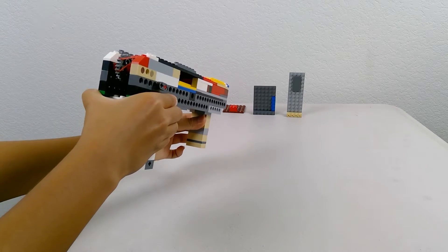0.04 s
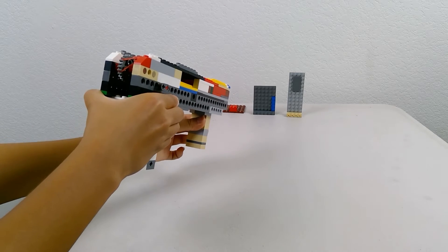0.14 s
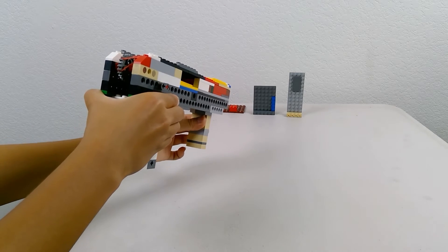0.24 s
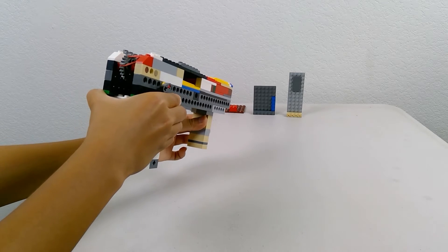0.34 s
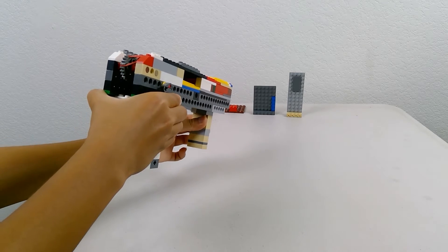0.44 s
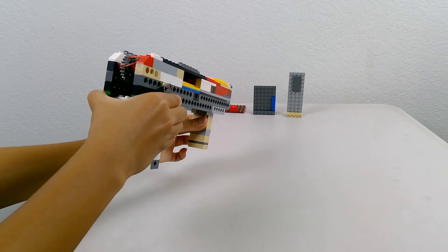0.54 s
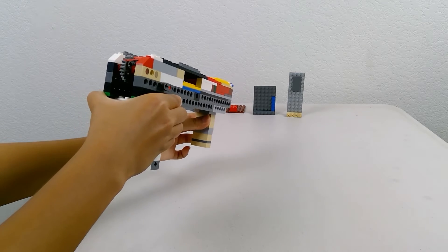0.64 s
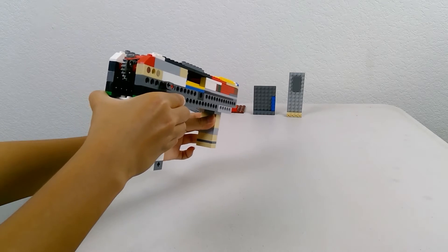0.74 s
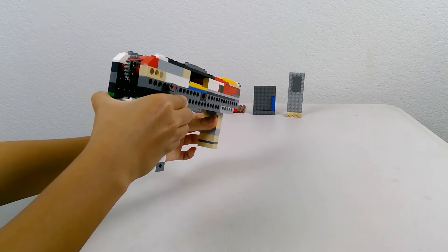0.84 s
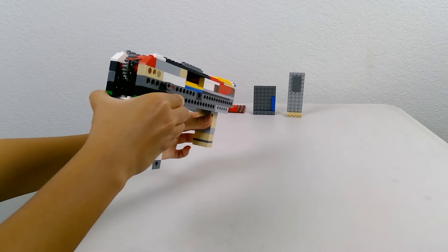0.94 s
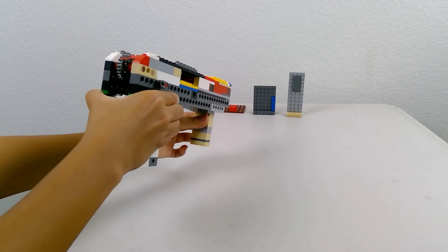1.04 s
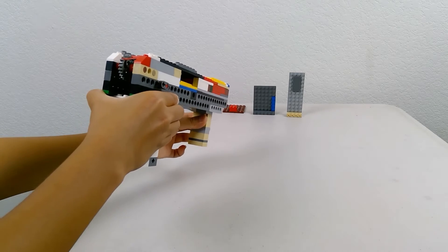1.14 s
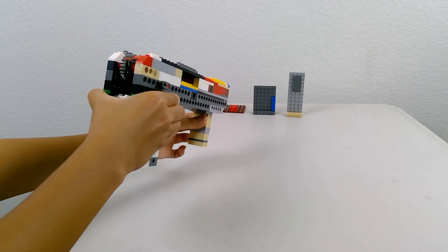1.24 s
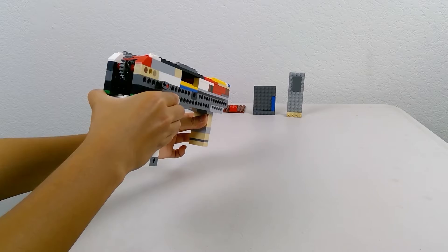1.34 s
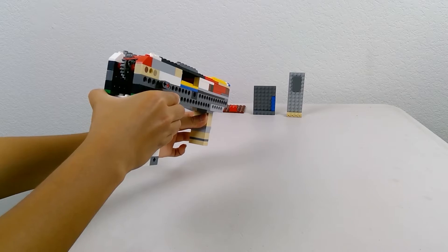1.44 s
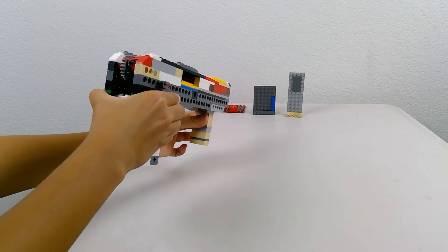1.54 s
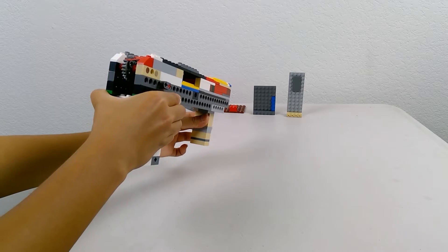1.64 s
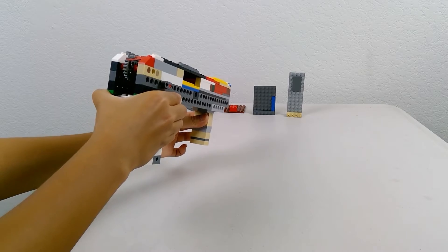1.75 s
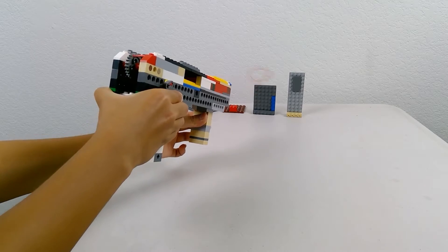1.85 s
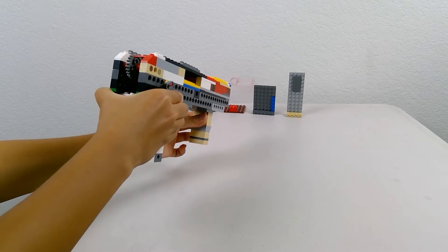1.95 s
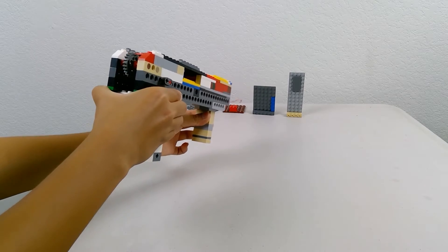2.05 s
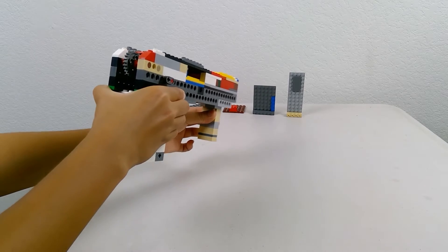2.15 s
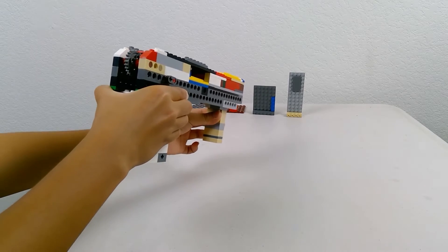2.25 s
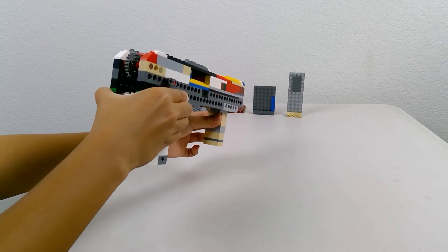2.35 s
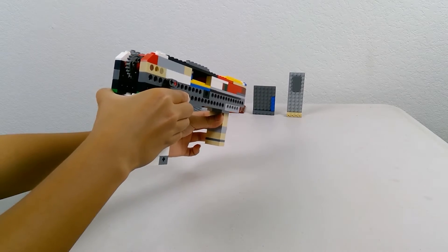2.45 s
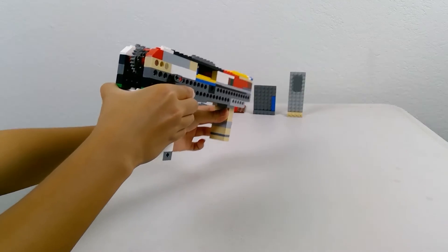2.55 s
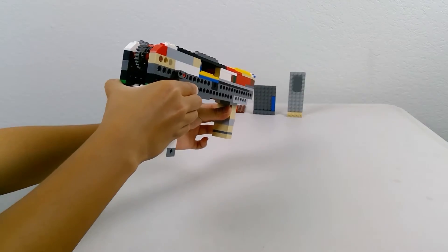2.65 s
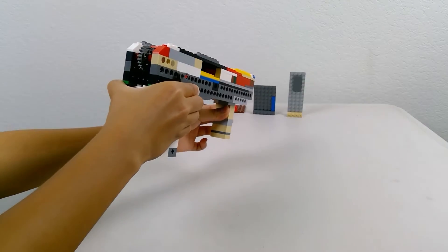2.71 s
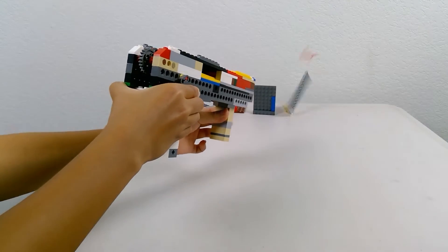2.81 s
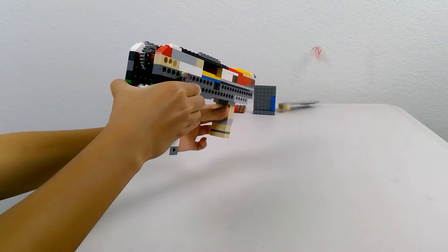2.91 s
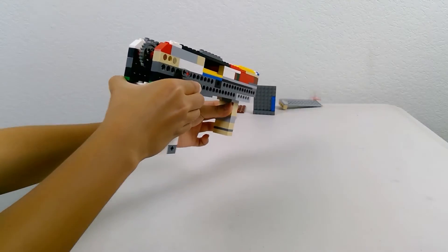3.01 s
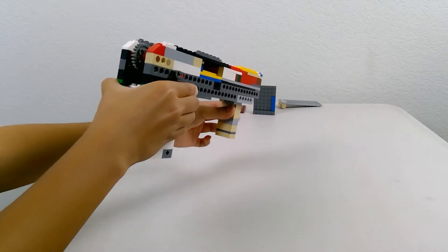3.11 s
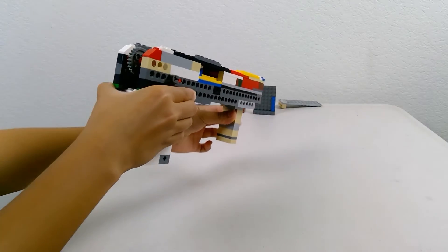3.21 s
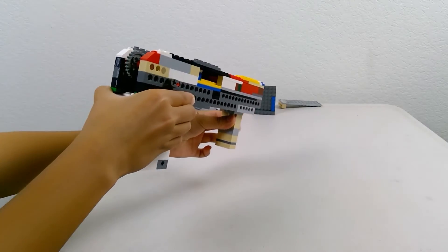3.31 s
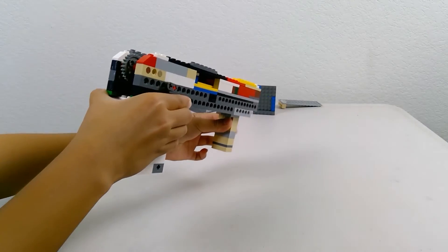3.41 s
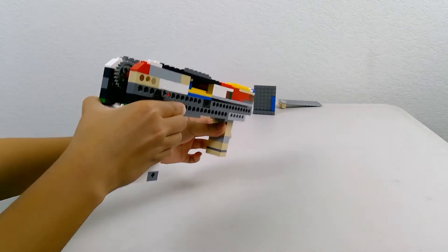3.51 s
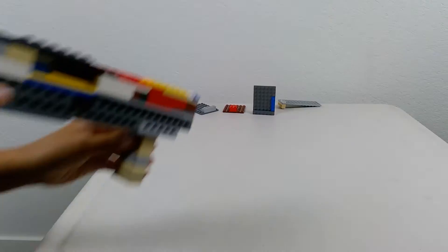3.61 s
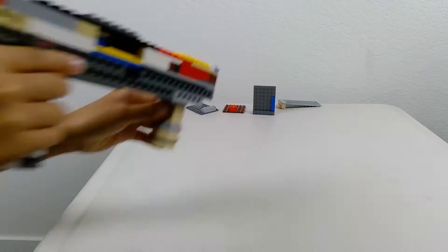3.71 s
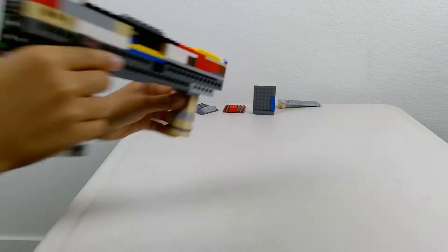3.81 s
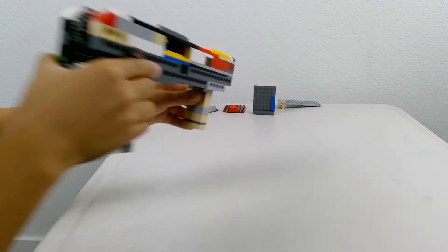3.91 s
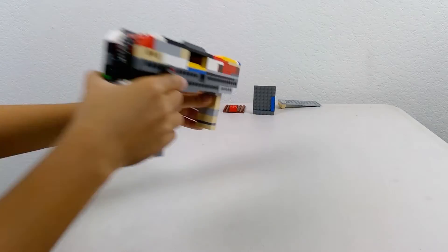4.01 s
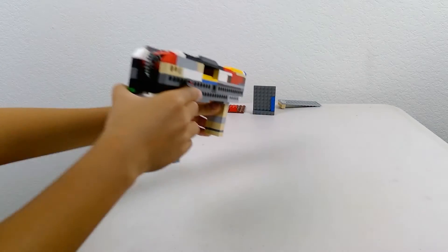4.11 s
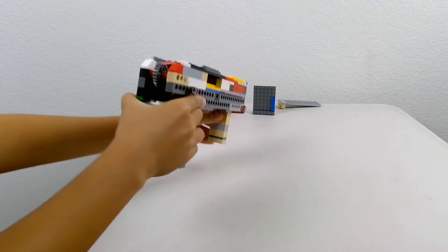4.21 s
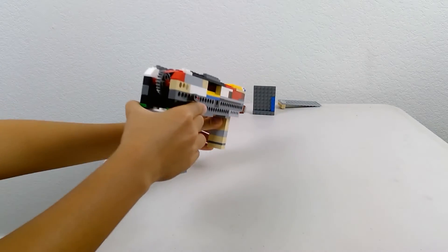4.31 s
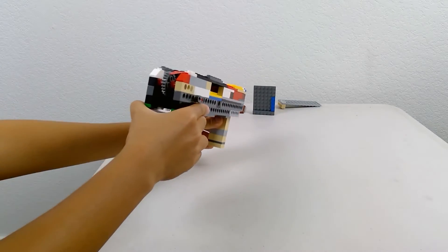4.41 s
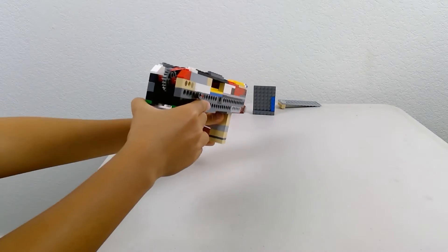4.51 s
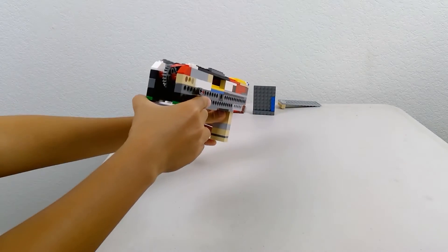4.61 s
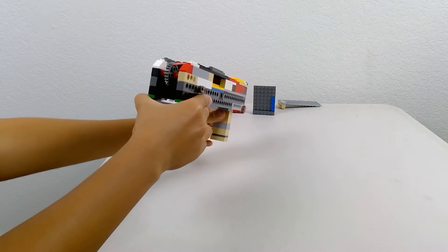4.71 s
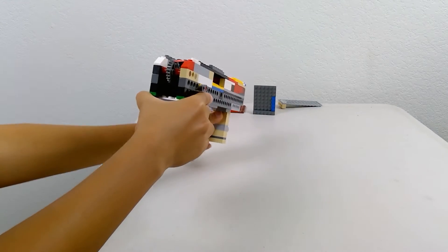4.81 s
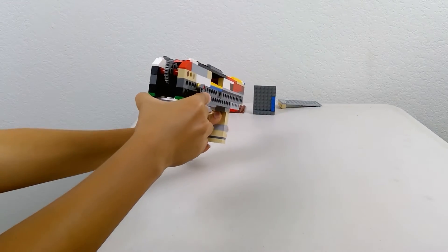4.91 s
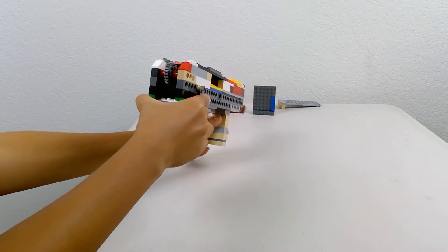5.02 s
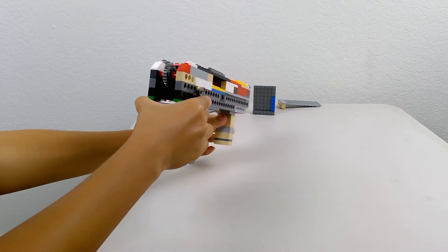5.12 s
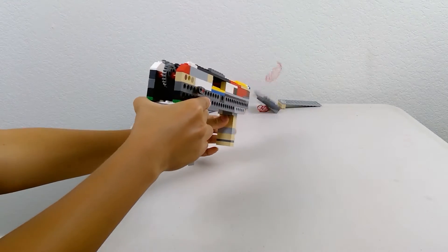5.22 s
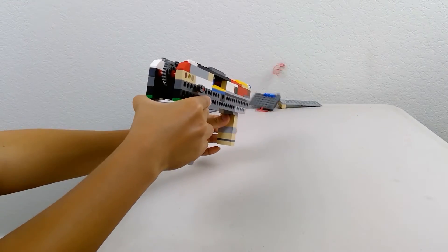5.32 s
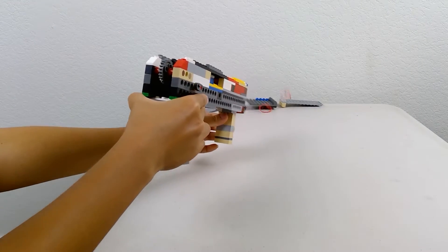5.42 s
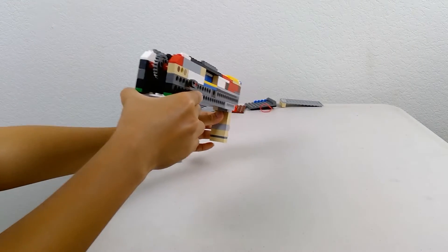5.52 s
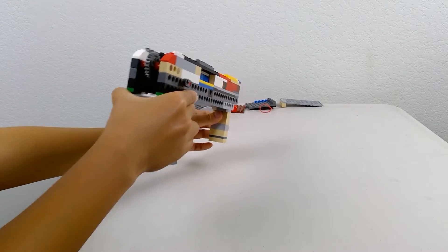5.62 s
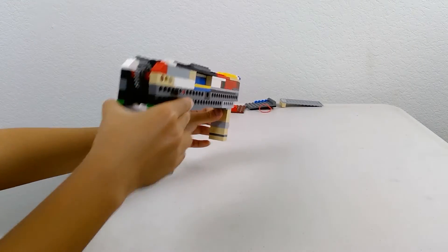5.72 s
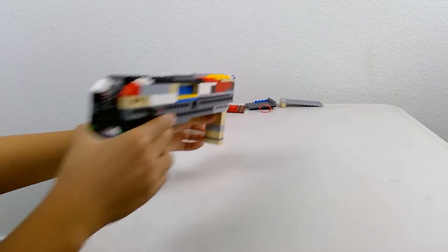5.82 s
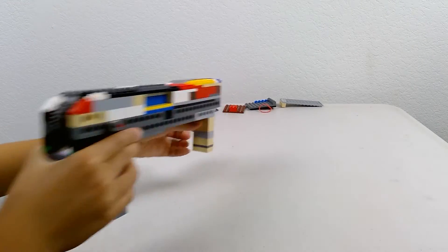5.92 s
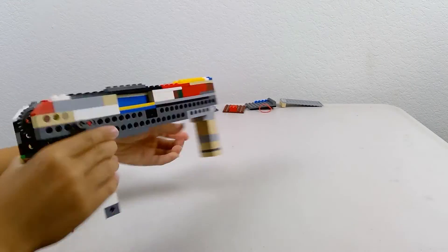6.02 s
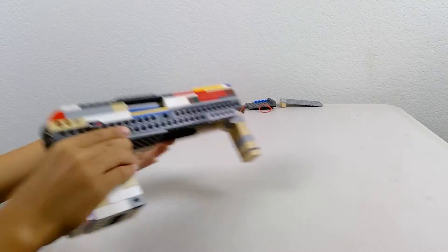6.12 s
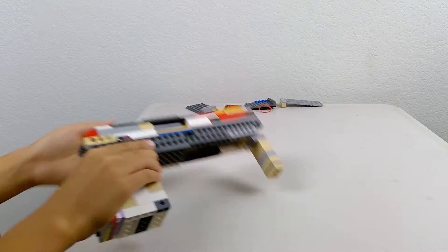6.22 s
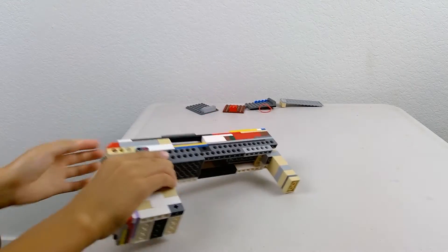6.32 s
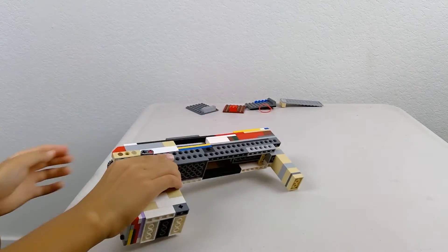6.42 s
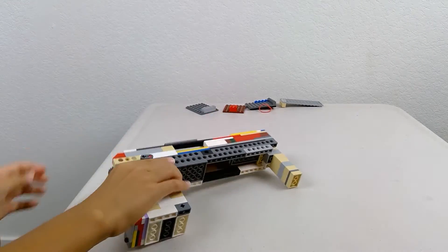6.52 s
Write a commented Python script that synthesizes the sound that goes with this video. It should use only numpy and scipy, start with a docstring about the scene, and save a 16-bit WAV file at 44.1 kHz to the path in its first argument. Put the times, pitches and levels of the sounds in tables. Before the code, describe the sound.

A toy pistol made of plastic bricks is cocked with two pairs of sharp snaps, then fires with a quick chattering clack, and a small target clatters loudly on a table. Another snap, a second shot, and a target falls flat and bounces. Finally the pistol is set down with a hollow knock. The sounds are close, slightly to the right, in a small hard room with a faint hum.

```python
"""Brick pistol over a folding table

In a small hard room, a pistol of plastic bricks is cocked and fired twice, close to the right
microphone of a pair. Catch and slide snap, the shots knock brick targets over, which clatter on the
table top, and the pistol is set down. Every blow is a few quick contacts on a briefly ringing part;
behind it the room rings on over a low hum."""
import sys
import numpy as np
from scipy import signal
from scipy.fft import rfft, irfft
from scipy.io import wavfile
from scipy.ndimage import uniform_filter1d

SR = 44100
rng = np.random.default_rng(int(sys.argv[2]) if len(sys.argv) > 2 else 0)


def waveform_to_disk(signal):
    """Save audio, clipped to [-1, 1], as 16-bit WAV at the path in sys.argv[1]."""
    frames = np.transpose(np.atleast_2d(signal))
    scaled = np.clip(frames, -1, 1) * 32767
    samples = np.round(scaled).astype(np.int16)
    wavfile.write(sys.argv[1], SR, samples)


N = 288842

BANDS_HZ = 31.25 * 2 ** (np.arange(19) / 2)
BLOW_SAMPLES = 6144
LN_1000 = np.log(1000)  # a decay of 60 dB


def undb(db):
    """Decibels to gain."""
    return 10 ** (np.asarray(db) / 20)


def unit(x):
    """Scale each row to an energy of one."""
    return x / np.sqrt(np.sum(x ** 2, axis=-1, keepdims=True) + 1e-18)


def at(table, hz, column=1):
    """Read a column of a table along log frequency."""
    rows = np.array(table, float)
    return np.interp(np.log(hz), np.log(rows[:, 0]), rows[:, column])


def add(track, s, sound):
    """Mix a sound into a track from time s on."""
    i = max(int(round(s * SR)), 0)
    part = sound[..., :max(track.shape[-1] - i, 0)]
    track[..., i:i + part.shape[-1]] += part


def band_noise(size):
    """One noise split into overlapping half-octave bands."""
    hz = np.maximum(np.arange(size // 2 + 1) * SR / size, 1)
    share = np.maximum(1 - 2 * abs(np.log2(hz / BANDS_HZ[:, None])), 0)
    return irfft(share * np.exp(2j * np.pi * rng.random(len(hz))), size)


# rumble of the room: (frequency [Hz], relative density [dB])
RUMBLE_COLOUR = [(12, -34.5), (20, -3), (65, -10), (93, -20), (328, -24), (356, -24), (386, -24),
                 (494, -33.5), (567, -32.5), (903, -36), (1190, -41), (1440, -38), (14000, -65.5)]
# mains hum: (time [s], level [dB])
HUM_LEVELS = [(0, -68), (1.5, -78), (2.5, -70), (3.8, -64.5), (6.5, -63)]


def room_tone(rumble_db=-63.5, side_db=-14, hum_hz=60.5):
    """A dull rumble, nearly alike at both microphones, and a mains hum in the centre."""
    hz = np.maximum(np.arange(N // 2 + 1) * SR / N, 1)
    spectrum = rfft(rng.standard_normal((2, N))) * undb(at(RUMBLE_COLOUR, hz))
    mid, side = unit(irfft(spectrum, N)) * np.sqrt(N)
    t = np.arange(N) / SR
    hum_rms = undb(np.interp(t, *np.transpose(HUM_LEVELS)))
    hum = hum_rms * np.sqrt(2) * np.sin(2 * np.pi * hum_hz * t)
    return undb(rumble_db) * (mid + undb(side_db) * np.array([side, -side])) + hum


# standing waves between the walls: (frequency [Hz], gain at resonance [dB], t60 [s])
STANDING_WAVES = [(36.6, 9, 1.3), (60, 17.5, 2.4), (130.4, 9.5, 1.1), (185.4, 4.5, 0.24)]


def standing_waves(t):
    """The room's lowest modes boom on after a blow."""
    hz, db, t60 = np.transpose(STANDING_WAVES)[:, :, None]
    rate = LN_1000 / t60
    return np.sum(undb(db) * 2 * rate / SR * np.exp(-rate * t) * np.sin(2 * np.pi * hz * t), axis=0)


# reverberation of the hard walls: (frequency [Hz], t60 [s], tail gain [dB])
ROOM_DECAY = [(40, 1.2, 10.5), (60, 0.91, 4), (127, 0.58, -3), (268, 0.85, 4), (696, 0.55, -5.5),
              (1500, 0.35, -3.5), (3700, 0.55, -7), (8000, 0.47, -9.5), (15000, 0.28, -8.5)]


def room_tail(x, build_s=0.0022, bass_build_cycles=2.1, alike_hz=1100, right_db=1.0):
    """Diffuse tail: the bass builds up late, stays long and is nearly alike at both microphones."""
    t = np.arange(SR * 3 // 2) / SR
    hz = BANDS_HZ[:, None]
    build = 1 - np.exp(-(t / (build_s + bass_build_cycles / hz)) ** 2)
    envelope = build * np.exp(-LN_1000 * t / at(ROOM_DECAY, hz))
    gain = undb(at(ROOM_DECAY, BANDS_HZ, column=2)) * np.sqrt(BANDS_HZ * np.log(2) / SR)
    alike = 0.21 + 0.78 / (1 + (BANDS_HZ / alike_hz) ** 2)
    mid = (gain * np.sqrt((1 + alike) / 2)) @ unit(band_noise(len(t)) * envelope)
    side = (gain * np.sqrt((1 - alike) / 2)) @ unit(band_noise(len(t)) * envelope)
    response = np.array([mid + side, (mid - side) * undb(right_db)]) + standing_waves(t)
    return signal.fftconvolve(x, response, axes=1)[:, :N]


# echoes off the table top and the wall behind: (delay [s], gain [dB])
EARLY_ECHOES = [(.0038, -20), (0.0093, -17.5)]


def near_field(x, right_db=2.5, left_db=-8.5, shadow_hz=250, left_lag_samples=3):
    """Direct sound and echoes reach the nearer, right microphone first and, above the bass, louder."""
    close = x.copy()
    for delay, db in EARLY_ECHOES:
        add(close, delay, undb(db) * x)
    left, right = np.roll(close[0], left_lag_samples), close[1]
    bass = signal.sosfilt(signal.butter(1, shadow_hz, fs=SR, output="sos"), left)
    return np.array([undb(left_db) * (left - bass) + undb(right_db) * bass, undb(right_db) * right])


def ringing(hz, t60):
    """Fading tones of unit energy that swing up within a cycle, one row each."""
    t = np.arange(BLOW_SAMPLES) / SR
    cycles = hz[:, None] * t
    phase = 2 * np.pi * rng.random((len(hz), 1))
    envelope = (1 - np.exp(-2 * cycles)) * np.exp(-LN_1000 * t / t60[:, None])
    return unit(np.sin(2 * np.pi * cycles + phase) * envelope)


def blow(bass_db, treble_db, ring_s, main_hz, main_db, colour, modes, *, modes_db, main_t60,
         chatter_s, rebound_db, crack_db, room_ring_db, damping=0.29, scatter_s=0.08):
    """Dense short resonances, longer modes and a crack. Rows: left, right, two ways into the room."""
    t = np.arange(BLOW_SAMPLES) / SR
    tilt = [(450, bass_db), (1400, 0.0092), (3600, 0.0037), (8000, treble_db)]
    gain = unit(undb(at(colour, BANDS_HZ) + at(tilt, BANDS_HZ)) * np.sqrt(BANDS_HZ))
    # high resonances die sooner
    t60 = np.maximum(ring_s, 0.003) * (np.maximum(BANDS_HZ, 400) / 2500) ** -damping
    fade = np.exp(-2 * LN_1000 * t / t60[:, None])
    power = fade.copy()
    for delay in (chatter_s / 2, chatter_s):  # the parts touch twice more
        add(power, delay, undb(rebound_db) ** 2 * fade)
    rise = 1 - np.exp(-4 * t * BANDS_HZ[:, None])
    noise = np.array([band_noise(BLOW_SAMPLES), band_noise(BLOW_SAMPLES)])
    shared, own = unit(noise * np.sqrt(power) * rise)
    # short waves reach the two microphones less alike
    alike = at([(200, 0.8), (1500, 1.0), (8000, 0.61)], BANDS_HZ)
    left = (gain * alike) @ shared + (gain * np.sqrt(1 - alike ** 2)) @ own
    right = gain @ shared
    # what leaves in all other directions is smeared by table and walls
    scattered = gain @ unit(noise[..., ::-1] * rise * np.exp(-LN_1000 * t / scatter_s))
    # the point of contact decides how strongly each mode answers
    hz, db, mode_t60 = np.transpose(modes)
    contact_db = 2.9 * rng.standard_normal(len(hz))
    strength = undb(db + at(tilt, hz) - max(bass_db, treble_db, 0) + contact_db)
    ring = undb(modes_db) * strength @ ringing(hz, mode_t60) / np.sqrt(len(hz))
    main = undb(main_db) * ringing(np.array([main_hz]), np.array([main_t60]))
    sound = np.array([left, right, *scattered])
    sound += (ring + main) * undb([[0], [0], [room_ring_db], [room_ring_db]])
    # the first contact is one strongly damped cycle in every band
    cycles = t[:BLOW_SAMPLES // 8] * BANDS_HZ[:, None]
    crack = unit(gain @ unit(np.exp(-3 * cycles) * np.cos(2 * np.pi * cycles)))
    add(sound, 0, undb(crack_db) * crack)
    return unit(sound)


def contacts(events, bass_db, ring_s, main_db, bass_slope=0, main_slope=0, rattle_per_db=0):
    """Hardness adds treble and may thin bass and main resonance; weak contacts may rattle longer."""
    loudest = max(row[1] for row in events)
    voiced = []
    for s, db, hardness, hz in events:
        rattle_s = ring_s * np.exp(rattle_per_db * (loudest - db))
        bass, main = bass_db - bass_slope * hardness, main_db - main_slope * hardness
        voiced.append((s, db, bass, hardness, rattle_s, hz, main))
    return voiced


def blows(events, colour, modes, room_db, **body):
    """All blows on one body; a level is the energy at the source spread over 10 ms."""
    track = np.zeros((4, N))
    for s, db, *timbre in events:
        add(track, s, undb(db) * np.sqrt(SR * 0.01) * blow(*timbre, colour, modes, **body))
    return track * undb([[0], [0], [room_db], [room_db]])


# the hardest blows jolt the whole pistol or the table top: (time [s], level [dB])
JOLT_EVENTS = [(.687, -31), (2.1206, -35), (3.016, -35.5), (6.379, -29.5)]


def jolts(push_s=0.00013):
    """A short one-sided push of air: a thump at the close microphones that leaves the room still."""
    t = np.arange(BLOW_SAMPLES) / SR
    push = unit(t * np.exp(-t / push_s))
    track = np.zeros(N)
    for s, db in JOLT_EVENTS:
        add(track, s, undb(db) * np.sqrt(SR * 0.01) * push)
    return track


# trigger and loose bricks: (time [s], level [dB], hardness [dB], main resonance [Hz])
TICK_EVENTS = [(.215, -50, 6, 2230), (1.839, -51, -16.5, 2044), (1.8732, -38, 0, 4540),
               (2.79, -57.5, -16, 1880), (2.8305, -42.5, 1, 2100), (4.215, -67.5, -9.5, 1992),
               (4.8738, -38.5, -1.5, 4190), (5.218, -41, 3, 4840), (5.922, -59, 12, 4490),
               (6.055, -65.5, 14, 6869), (6.083, -55.5, 2.5, 2305)]
# thin colour of a tick: (frequency [Hz], relative density [dB])
TICK_SPECTRUM = [(100, -20.5), (1000, -21.5), (1400, -15.5), (2000, -0.5), (2830, -5.5), (4000, 5),
                 (5660, -3), (10000, -12.5), (15000, -16.5)]
# modes of the small parts: (frequency [Hz], level [dB], t60 [s])
SMALL_PART_MODES = [(1930, -4.5, 0.065), (2150, 2, 0.119), (3820, -2.5, .03), (4296, 1, 0.031),
                    (4750, 0, .05)]


def ticks():
    """Trigger and loose bricks tick faintly, close by, with little room on them."""
    touches = contacts(TICK_EVENTS, bass_db=-4.5, ring_s=0.034, main_db=-3)
    return blows(touches, TICK_SPECTRUM, SMALL_PART_MODES, modes_db=-1, main_t60=0.032,
                 chatter_s=0.002, rebound_db=-15, crack_db=-23, room_db=-5, room_ring_db=-4.5)


# the pistol meets the table: (time [s], level [dB], hardness [dB], main resonance [Hz])
LANDING_KNOCKS = [(6.378, -17.5, 0, 980), (6.3845, -16, -5.5, 1093), (6.402, -26, -14, 272)]
# hollow colour of those knocks: (frequency [Hz], relative density [dB])
LANDING_SPECTRUM = [(30, -7), (60, -14), (120, -0.5), (250, -6.5), (450, -4), (700, 1), (1000, -2),
                    (1500, -3), (2100, -11), (3000, -4.5), (4300, -20), (6500, -25.5), (10000, -37),
                    (15000, -53)]
# modes of the table top: (frequency [Hz], level [dB], t60 [s])
TABLE_TOP_MODES = [(128.2, 0, 0.29), (156.8, -19, .25), (265, 1, 0.56), (430.3, 4.5, .25), (470, 4, 0.37),
                   (594, 4, 0.37), (635, 5.5, 0.15), (768, 4.5, 0.12), (941, 10.5, 0.12), (1090, 7.5, 0.28),
                   (1192, -2.5, 0.21), (1747, 3.5, 0.081)]


def landing():
    """The pistol is set down near the microphones and the table top rings."""
    knocks = contacts(LANDING_KNOCKS, bass_db=-3, ring_s=0.058, main_db=-7, bass_slope=0.3)
    return blows(knocks, LANDING_SPECTRUM, TABLE_TOP_MODES, modes_db=0, main_t60=0.058,
                 chatter_s=0.0017, rebound_db=-22, crack_db=-20, room_db=-3.5, room_ring_db=-6)


def toppling(start_s=5.3075, first_db=-17.5, first_hz=858, hardness_db=-17,
             flight_s=0.1057, flight_kept=0.62, loss_db=4, pitch_rise=1.19):
    """A broad target falls flat and bounces: each flight is shorter, each slap weaker and higher."""
    slaps, s = [], start_s
    for bounce in range(3):
        db = first_db - loss_db * np.sqrt(bounce)
        hz = first_hz * pitch_rise ** bounce
        near_edge = (s, db, hardness_db, hz)
        far_edge = (s + 0.008, db - 3, hardness_db, hz * 1.102)
        slaps += [near_edge, far_edge]
        s += flight_s * flight_kept ** bounce
    return slaps


# flying bricks and tipping targets: (time [s], level [dB], hardness [dB], main resonance [Hz])
TARGET_HITS = [(3.0095, -12, 1.5, 1810), (3.0252, -14, 1, 863), (3.0295, -20, -8, 905),
               (3.0422, -23.5, -5.5, 1518), (3.096, -24, -7, 1940), (3.111, -25.5, 1.5, 1680),
               (3.165, -19, 0.5, 1438), (5.3225, -24, 9, 2803), (5.335, -30.5, -7, 660),
               (5.4132, -29.5, 6, 1860), (5.446, -33.5, 8.5, 1230), (5.546, -30.5, -20, 1590),
               (5.5705, -27.5, 5.5, 946), (5.619, -32, -36, 1526), (5.67, -41, 2, 2260)]
# colour of their clatter: (frequency [Hz], relative density [dB])
CLATTER_SPECTRUM = [(30, -8), (60, -12), (120, -6.5), (250, -10.5), (450, -10), (700, -2), (1000, 0),
                    (1500, -1.5), (2100, -5.5), (3000, -1), (4300, -7), (6500, -15), (10000, -23.5),
                    (15000, -41)]
# modes that stand out of the clatter: (frequency [Hz], level [dB], t60 [s])
CLATTER_MODES = [(686.5, 1.5, 0.37), (767, 1.5, .15), (914, 3.5, .2), (1044, -9.5, 0.18),
                 (1413, -3.5, 0.31), (1534, 3.5, .2), (1750, -1, 0.15), (2020, 0, 0.19), (2430, -3, .14),
                 (2677, -4, 0.34), (3130, -4.5, .1)]


def targets():
    """Bricks hit the targets and ricochet, the broad one slaps on the table, and the room answers."""
    hits = contacts(TARGET_HITS, bass_db=-9.5, ring_s=0.018, main_db=-2.5,
                    bass_slope=0.1, rattle_per_db=0.19)
    slaps = contacts(toppling(), bass_db=6, ring_s=0.013, main_db=2)
    return blows(hits + slaps, CLATTER_SPECTRUM, CLATTER_MODES, modes_db=-3.5, main_t60=0.033,
                 chatter_s=0.0032, rebound_db=-2.5, crack_db=-20, room_db=1, room_ring_db=-2.5)


# hands on the grip: (time [s], level [dB], hardness [dB], main resonance [Hz])
GRIP_BUMPS = [(2.086, -40.5, 3.5, 730.6), (2.382, -44.5, -7, 918), (2.45, -52.5, 3.5, 340)]
# dull colour of a bump: (frequency [Hz], relative density [dB])
GRIP_SPECTRUM = [(40, 0), (120, -14), (330, -1.5), (550, -3.5), (850, 10.5), (1300, -30.5), (3000, -32),
                 (12000, -42.5)]
# modes of the pistol's body, under bumps and snaps alike: (frequency [Hz], level [dB], t60 [s])
PISTOL_MODES = [(1040, -0.5, .05), (1600, 0, .07), (2290, -1, 0.067), (2370, 4, .05), (2845, 7.5, 0.075),
                (3450, -0.5, .07), (3930, -10, .04), (4330, -1.5, .05)]


def grip():
    """The hands bump the grip softly; the body barely rings."""
    bumps = contacts(GRIP_BUMPS, bass_db=3, ring_s=0.053, main_db=-5.5)
    return blows(bumps, GRIP_SPECTRUM, PISTOL_MODES, modes_db=-26, main_t60=0.08,
                 chatter_s=0.032, rebound_db=-7.5, crack_db=-26.5, room_db=-2.5, room_ring_db=-6.5)


# snaps and the dull knocks after them: (time [s], level [dB], hardness [dB], main resonance [Hz])
PISTOL_SNAPS = [(.4222, -27.5, 0.5, 2230), (.6868, -18, 4, 3490), (1.9013, -21.5, 1, 2065),
                (1.94, -32, -17, 1614), (2.1203, -17.5, 0.5, 5015), (2.869, -33, 5, 2630),
                (2.874, -30.5, 1, 2300), (2.881, -34.5, 0, 2320), (2.898, -28, -7, 1063),
                (2.906, -26, -24, 991), (4.905, -24, 0, 4870), (5.2252, -25, 3, 2820),
                (5.2398, -25.5, -9.5, 2840), (5.247, -26.5, -18.5, 1634)]
# bright colour of a snap: (frequency [Hz], relative density [dB])
SNAP_SPECTRUM = [(30, -10), (60, -10.5), (120, -13), (250, -10.5), (450, -11), (700, -4), (1000, -6),
                 (1500, -2.5), (2100, 3), (3000, 1.5), (4300, 4), (6500, -1.5), (10000, -6), (15000, -12)]


def catch_and_slide():
    """Close to the right microphone, catch and slide snap and chatter on the plastic body."""
    snaps = contacts(PISTOL_SNAPS, bass_db=-0.5, ring_s=0.027, main_db=-6.5,
                     bass_slope=0.67, main_slope=0.64)
    return blows(snaps, SNAP_SPECTRUM, PISTOL_MODES, modes_db=-10, main_t60=0.043,
                 chatter_s=0.004, rebound_db=1, crack_db=-23.5, room_db=-2, room_ring_db=-3)


def scene():
    """Pistol, targets and table up close, the small room around them."""
    sound = catch_and_slide() + ticks() + grip() + targets() + landing()
    direct, into_room = sound[:2], sound[2:]
    # each way into the room has its own reflections, which evens out the tail
    tail = sum(room_tail(way[None]) for way in into_room) / np.sqrt(2)
    return near_field(direct + jolts()) + tail + room_tone()


def suppress(x, threshold_db=-96, depth_db=-9, size=512):
    """Noise suppressor: bins that sink towards the threshold are turned down, shortening the tails."""
    bins = signal.stft(x, nperseg=size)[2]
    power = np.mean(abs(bins) ** 2, axis=0)
    power = uniform_filter1d(power, 5, axis=0)  # over frequency
    power = uniform_filter1d(power, 3, axis=1)  # over time
    keep = np.clip(power / (abs(power) + undb(threshold_db) ** 2), 0, 1)
    return signal.istft(bins * undb(depth_db * (1 - keep)), nperseg=size)[1][:, :N]


def record(dry):
    """After the microphones, faint noise is suppressed and the top is cut at 16 kHz."""
    return signal.sosfilt(signal.ellip(12, 0.2, 90, 16000, fs=SR, output="sos"), suppress(dry))


dry = scene()
out = record(dry)
waveform_to_disk(out)
```